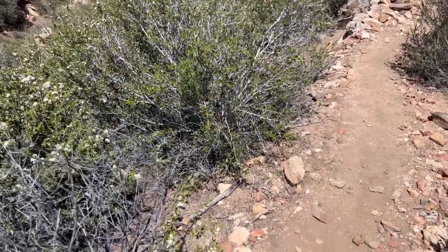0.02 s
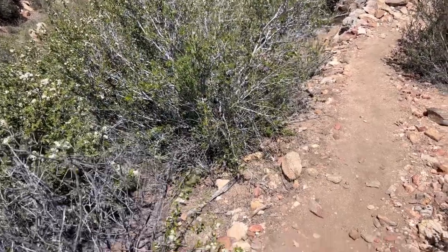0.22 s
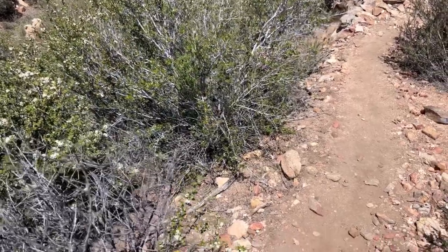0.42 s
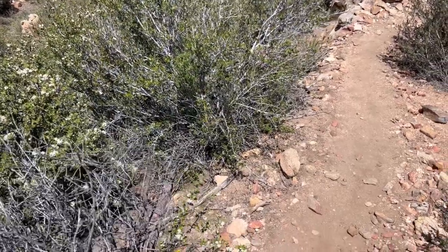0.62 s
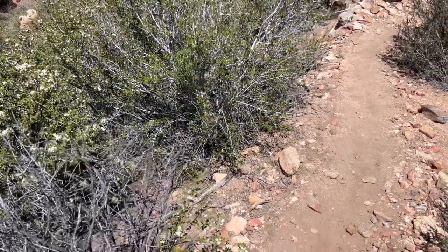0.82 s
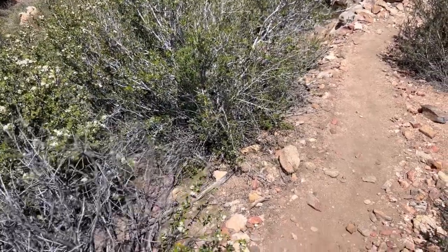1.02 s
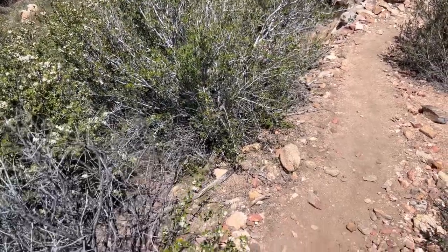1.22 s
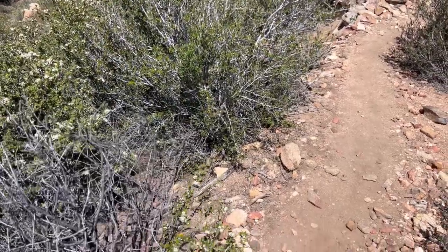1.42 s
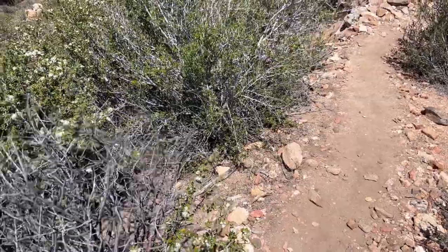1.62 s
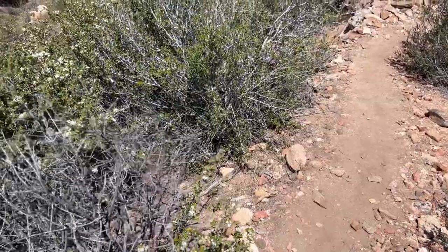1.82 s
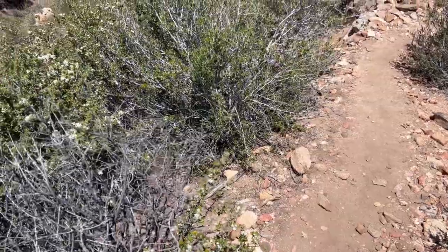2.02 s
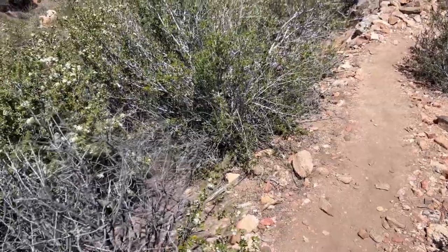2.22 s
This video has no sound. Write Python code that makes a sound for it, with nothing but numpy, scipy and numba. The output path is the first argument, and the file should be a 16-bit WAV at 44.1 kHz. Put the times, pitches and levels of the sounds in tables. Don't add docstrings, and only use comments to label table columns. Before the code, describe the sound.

Unbroken, high, grainy rattlesnake buzz from a trailside bush, recorded on a handheld phone with wind bumping mostly the left side, faint leaf wash, scattered twig ticks and a late crunch underfoot.

```python
import sys
import numpy as np
from scipy import signal
from scipy.fft import rfft, irfft, next_fast_len
from scipy.io import wavfile
from scipy.ndimage import uniform_filter1d, map_coordinates
from numba import njit

SR = 44100
rng = np.random.default_rng(int(sys.argv[2]) if len(sys.argv) > 2 else 0)


def how_loud(loudness_db):
    steps = np.asarray(loudness_db, float) / 20
    return 10 ** steps


def wav_record(signal):
    frames = np.transpose(np.atleast_2d(signal))
    bounded = np.clip(frames, -1, 1)
    quanta = np.round(bounded * 32767).astype(np.int16)
    wavfile.write(sys.argv[1], SR, quanta)


N = 101430


def ramp(table, x):
    points, values = np.transpose(table)
    return np.interp(x, points, values)


def unit(x):
    return x / np.sqrt(np.mean(x ** 2, axis=-1, keepdims=True))


def colour(x, table):
    size = next_fast_len(N)
    log_hz = np.log(np.arange(size // 2 + 1) * SR / size + 1)
    hz, db = np.transpose(table)
    gain = how_loud(np.interp(log_hz, np.log(hz), db))
    return irfft(rfft(x, size) * gain, size)[..., :N]


@njit
def svf(x, hz, width):
    out, band, low = np.empty(len(x)), 0., 0.
    for i in range(len(x)):
        g = np.tan(np.pi * hz[i] / SR)
        damping = width / hz[i]
        v = (band + g * (x[i] - low)) / (1 + g * (g + damping))
        band = 2 * v - band
        low = low + 2 * g * v
        out[i] = damping * v
    return out


def resonate(x, hz, width):
    centre = np.ones(len(x)) * hz
    return svf(svf(x, centre, float(width)), centre, float(width))


def walk(rate):
    at = np.arange(0, N + 64, 64)
    wander = map_coordinates(rng.standard_normal(400), [at * rate / SR], mode="mirror")
    return np.interp(np.arange(N), at, wander)


def clicks(rate, spread_db):
    chance, sign, size = rng.random((3, N))
    return (chance < rate / SR) * np.sign(sign - .5) * how_loud(-spread_db * np.log(size + 1e-9))


# frequency in Hz, level in dB per Hz.
AIR_COLOUR = [(250, -2.5), (500, 2), (1100, -7.5), (1600, -2), (2600, -4), (5000, -4), (10000, -11),
              (11000, -63)]


def air():
    alike = 0.71
    noise = rng.standard_normal((3, N))
    mixed = np.sqrt(alike) * noise[0] + np.sqrt(1 - alike) * noise[1:]
    lean_db = np.array([[1.2], [-1.2]])
    return unit(colour(mixed, AIR_COLOUR)) * how_loud(-53.5 + lean_db + .4 * walk(3.74))


# start in seconds, peak in dB, pitch in Hz, pan to the left in dB.
TICKS = [(0.267, -38, 1050, -3), (0.251, -42, 360, 0), (.488, -39, 1500, -3.5), (.489, -42, 2400, 0),
         (.507, -38.5, 2100, 1), (.57, -44, 1316, 4), (.68, -45, 600, 6), (0.71, -42, 1280, 0),
         (0.789, -40.5, 1270, 4), (0.981, -44.5, 444, 8), (0.985, -42.5, 1600, 1.5),
         (1.638, -37, 1290, 1.5), (1.685, -43, 1090, 2), (1.916, -38, 1470, -1.5), (1.948, -43, 1310, -3),
         (1.953, -41, 1700, -2), (1.9655, -36.5, 970, 1), (1.97, -40, 520, 4), (1.974, -46, 1500, 0),
         (2.005, -38, 475, 4), (2.022, -36, 800, 0), (2.031, -47, 1000, -2), (2.0029, -25, 1150, -.5),
         (2.0068, -29, 850, 0), (1.982, -33, 1050, -1), (2.012, -37, 1260, 21), (2.017, -46, 1500, -3),
         (2.056, -41, 1170, 3.5), (2.063, -46, 1310, -6), (2.217, -38.5, 1040, 5), (2.252, -40.5, 1070, -1),
         (2.296, -50.5, 495, 2)]
# start in seconds, length in seconds, level in dB.
CRUNCHES = [
    (1.955, .05, -47.5),
    (2.2, 0.032, -53.5),
    (2.2, 0.11, -72),
]


def ground(t):
    tick_t60, tail_t60, tail_db = .006, .024, -12
    out = np.zeros((2, N + 4096))
    age = np.arange(4096) / SR
    for at, db, hz, pan_db in TICKS:
        decay = how_loud(-60 * age / tick_t60) + how_loud(tail_db - 60 * age / tail_t60)
        push = rng.standard_normal(len(age)) * decay
        snap = 9 * (age == 0)
        tick = resonate(push + snap, hz, .8 * hz)
        pan = np.array([[pan_db], [-pan_db]]) / 2
        out[:, int(at * SR):][:, :len(age)] += tick / np.abs(tick).max() * how_loud(db + pan)
    out = out[:, :N]
    for at, length, db in CRUNCHES:
        grit = unit(resonate(clicks(610, 2.5), 1150, 1600))
        out += grit * how_loud(db) * np.sin(np.pi * np.clip((t - at) / length, 0, 1))
    return out


# time in seconds, level in dB.
WIND_LEVEL = [(0, -28.5), (.35, -27), (.45, -26), (.57, -31), (.7, -26), (.85, -33), (1.05, -31),
              (1.2, -30), (1.45, -31), (1.6, -34), (1.8, -31.5), (2.0, -34), (2.3, -31.5)]
# frequency in Hz, level in dB per Hz.
WIND_COLOUR = [(28, -23.5), (44, -1.5), (60, 6), (90, -2.5), (150, -9), (250, -23.5), (320, -41),
               (600, -62.5)]
# centre in seconds, peak in dB, pitch in Hz, length in seconds.
THUMPS = [(0.076, -20, 86, 0.014), (0.236, -17, 83.6, 0.022), (0.298, -15.5, 79, 0.019),
          (0.3894, -8, 88.3, 0.012), (.3965, -23, 247, 0.0023), (0.4014, 2, 122, 0.0031),
          (0.4094, -3, 88, 0.0045), (0.433, -12, 74.3, .008), (0.447, -13, 72.4, 0.0063),
          (.609, -13.5, 207, 0.0036), (.6197, -3.5, 112, .005), (.6365, -5.5, 180, .0038),
          (.6305, -18, 120, .003), (0.645, -6, 84.7, 0.03), (0.659, -10.5, 159.4, 0.0071),
          (0.934, -14, 67.7, 0.02), (1.016, -14.5, 66.2, 0.014), (1.097, -14.5, 101, 0.0064),
          (1.184, -14, 85.6, 0.013), (1.315, -13, 81, 0.016), (1.34, -19.5, 187, 0.0052),
          (1.353, -12, 97.5, 0.01), (0.46, -29.5, 227, 0.0038), (0.6176, -10, 72.3, 0.013),
          (0.593, -15.5, 128, .006), (1.135, -22, 62.5, 0.032), (1.5736, -17, 80, 0.011),
          (1.667, -19.5, 64.5, 0.0088), (1.83, -20.5, 84.4, 0.022), (2.0178, -18.5, 80, 0.012),
          (2.008, -17.5, 96, 0.0034), (0.183, -23, 159, 0.0064), (0.713, -20.5, 70, .012),
          (.745, -17, 60, .012), (0.778, -20, 70, 0.0068), (1.278, -21.5, 55, 0.0089),
          (1.407, -19.5, 80, .01), (1.489, -20, 75, .009), (1.87, -18.5, 65, 0.0067),
          (1.819, -32.5, 195, 0.0052), (.25, -26.5, 196, 0.0037), (0.831, -22.5, 109, .005),
          (1.226, -18, 63.8, 0.016), (1.45, -22.5, 146, 0.005), (1.537, -31.5, 198, .006),
          (1.74, -24, 136, 0.0039), (2.17, -26, 159, 0.007), (0.983, -32.5, 196, 0.0041),
          (2.234, -20, 88.5, 0.013), (2.296, -15.5, 86.2, 0.014)]
# frequency in Hz, gain in dB.
PORT = [(15, -30), (35, -9), (55, 0), (20000, 0)]
# frequency in Hz, gain in dB.
WIND_RIGHT = [(30, -4), (70, -10.5), (150, -12.5), (300, -5)]


def wind(t):
    turbulence = rng.standard_normal((2, N)) * how_loud(1.5 * walk(25.66))
    eddies = unit(colour(turbulence, WIND_COLOUR)) * how_loud(ramp(WIND_LEVEL, t) + 4)
    thumps, calm, gust = 0, 1, 0
    for at, db, hz, length in THUMPS:
        swell = how_loud(db) * np.exp(-((t - at) / length) ** 2)
        thumps = thumps - swell * np.cos(2 * np.pi * hz * (t - at))
        gust = gust + swell
        calm = calm * (1 - 0.47 * np.exp(-((t - at) / (length + 0.0041)) ** 2))
    hiss = unit(resonate(rng.standard_normal(N), 400, 260))
    left = colour(thumps, PORT) + calm * eddies[0] + how_loud(-48.5) * gust * hiss
    right = colour(left, WIND_RIGHT) + how_loud(-29) * eddies[1]
    return np.array([left, right])


# ring in Hz, width in Hz, left level in dB, right level in dB.
SEGMENTS = [(3006, 61, -63.5, -121.5), (3280, 2200, -109, -61), (3918, 520, -67, -57.5),
            (4205, 705, -51, -55), (4660, 880, -46.5, -72), (4680, 1500, -94.5, -63), (5460, 320, -49, -96),
            (6040, 1370, -53, -99), (5740, 820, -93, -50.5), (6890, 580, -62, -91), (7750, 1400, -95, -65),
            (7940, 1370, -86, -61), (9470, 910, -75.5, -102), (9920, 1800, -69, -102)]
# delay in seconds, level in dB, sway of the delay in seconds.
ECHOES = [
    (.0021, -8, .0001),
    (.0047, -8, .00012),
    (.0083, -10, .00012),
]
# time in seconds, level in dB.
EFFORT = [(0, 1), (.4, 1.3), (.8, 1.1), (1.2, 0.9), (1.6, 1.3), (2.0, 1), (2.3, 1)]


def rattle(t):
    shake_hz = 65.5 * (1 + 0.054 * walk(7.04))
    phase = 2 * np.pi * np.cumsum(shake_hz) / SR
    clacks_per_s = 2500
    shared = 0.85
    whole = clicks(clacks_per_s, 0)
    out = np.zeros((2, N))
    for k, (hz, width, left_db, right_db) in enumerate(SEGMENTS):
        centre = hz * (1 + .012 * walk(4.81))
        swing = 1 + 0.047 * np.cos(phase + .5 * k)
        push = np.sqrt(shared) * whole + np.sqrt(1 - shared) * clicks(clacks_per_s, 0)
        ring = unit(resonate(push * swing, centre, 1.08 * width))
        ring = ring * how_loud(.3 * walk(0.33) + .3 * walk(20))
        out += ring * how_loud(np.array([[left_db], [right_db]]))
    heard = out
    for delay, db, sway in ECHOES:
        at = [(t - delay - sway * walk(3)) * SR]
        heard = heard + how_loud(db) * np.array([map_coordinates(v, at, mode="mirror") for v in out])
    return heard * how_loud(ramp(EFFORT, t) - 2.5)


def scene():
    t = np.arange(N) / SR
    return rattle(t) + wind(t) + ground(t) + air()


# frequency in Hz, share of the time lost.
DROPS = [(1500, .001), (3000, .02), (5700, .03), (6500, .28), (7900, .28), (8100, .05), (9900, .12),
         (10500, .9), (11500, .5), (14600, .35), (15000, .001)]


def dropouts(x):
    mid_side = np.array([x[0] + x[1], x[0] - x[1]]) / 2
    f, _, z = signal.stft(mid_side, SR, nperseg=1024, noverlap=768)
    hold = int(.06 * SR / 256)
    field = rng.standard_normal((2, 129, z.shape[2]))
    field = uniform_filter1d(field, hold, axis=2) * np.sqrt(hold)
    field = np.repeat(field, 4, axis=1)[:, :len(f)]
    lost = np.clip(ramp(DROPS, f), .001, .99)
    edge = np.log(1 / lost - 1) / 2.08
    kept = z / (1 + np.exp(6 * (field - edge[:, None])))
    mid, side = signal.istft(kept, SR, nperseg=1024, noverlap=768)[1][:, :N]
    return np.array([mid + side, mid - side])


def band_limit(x):
    return signal.sosfilt(signal.butter(12, 17110, fs=SR, output="sos"), x)


# frequency in Hz, level in dB per Hz.
HISS = [(10800, -40), (11050, -8), (12850, -6), (13000, -45), (14400, -45), (14600, -8), (15720, 4),
        (15800, -45)]


def record(dry):
    f = np.arange(N // 2 + 1) * SR / N
    roll_off = how_loud(-4.5 * np.maximum(f - 9480, 0) / 1000)
    split = np.where(f > 8000, [[1], [-how_loud(7.5)]], 1)
    mid, side = unit(colour(rng.standard_normal((2, N)), HISS))
    hiss = how_loud(-72) * (mid + how_loud(-8) * side * np.array([[1], [-1]]))
    mix = dropouts(irfft(rfft(dry) * roll_off * split, N) + hiss)
    return band_limit(np.clip(mix, -1, 1))


dry = scene()
out = record(dry)
wav_record(out)
```